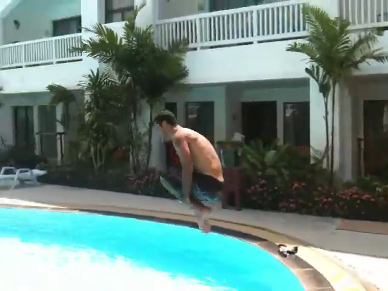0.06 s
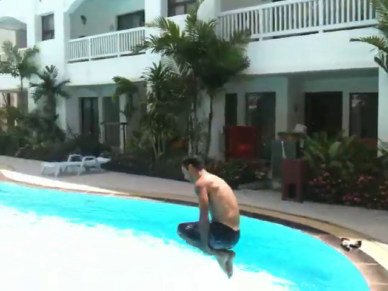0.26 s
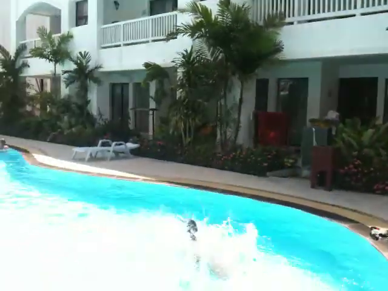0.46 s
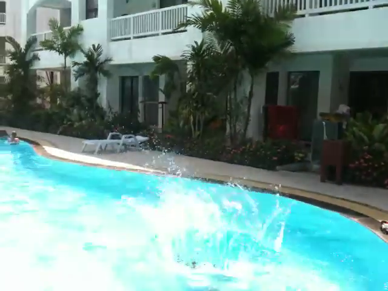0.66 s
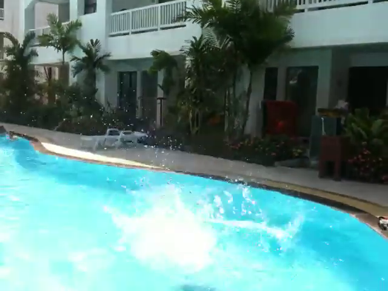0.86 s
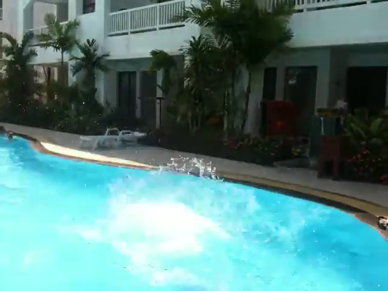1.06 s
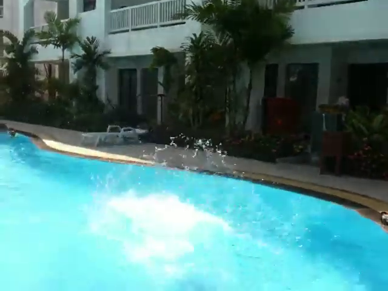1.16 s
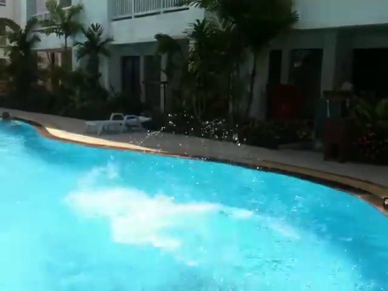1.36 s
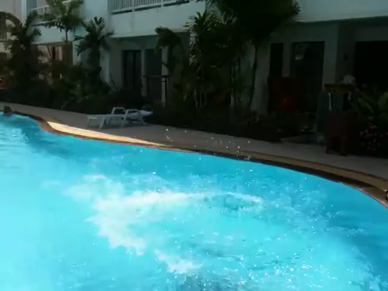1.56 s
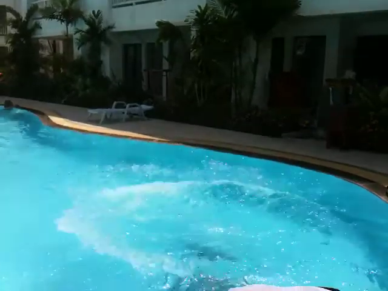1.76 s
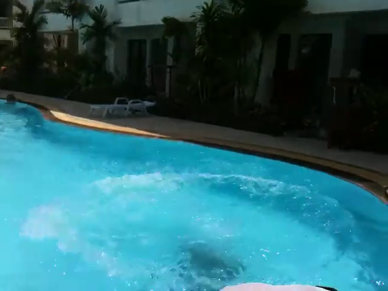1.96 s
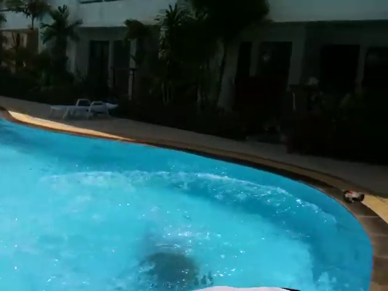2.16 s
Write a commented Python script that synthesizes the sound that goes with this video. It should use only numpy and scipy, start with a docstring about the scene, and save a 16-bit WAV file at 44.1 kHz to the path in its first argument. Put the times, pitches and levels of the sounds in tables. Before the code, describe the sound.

A big splash as a person jumps into an outdoor pool a few metres away, just after wind briefly thumps the microphone. The water gulps and churns, then spray patters down and fizzes away, with a weak courtyard echo.

```python
"""Outdoor swimming pool in a courtyard: a jumper lands tucked, a few metres from the microphone.
Air buffets the microphone during the jump. The body slaps the water and the cavity closes in low
gulps of ringing air pockets. Thrown water rains back as a patter of drops and a froth of small
bubbles that dies away. Ripples trickle at the edge; the house fronts return a weak echo."""
import sys
import numpy as np
from scipy import signal
from scipy.fft import rfft, irfft
from scipy.io import wavfile
from scipy.ndimage import uniform_filter1d

SR = 44100
rng = np.random.default_rng(int(sys.argv[2]) if len(sys.argv) > 2 else 0)


def store_wav(level_fs):
    """Save 16-bit WAV to argv[1]."""
    pcm = np.round(np.clip(np.atleast_2d(level_fs), -1, 1) * 32767)
    wavfile.write(sys.argv[1], SR, pcm.T.astype(np.int16))


N = 97020  # 2.2 s


def undb(db):
    """Decibels to gain."""
    return 10 ** (np.asarray(db) / 20)


def unit(x):
    """Scale to rms 1."""
    return x / np.sqrt(np.mean(x ** 2) + 1e-20)


def envelope(table, column=1):
    """Gain over time from one dB column; silent before the first row."""
    rows = np.array(table)
    return undb(np.interp(np.arange(N) / SR, rows[:, 0], rows[:, column], left=-120))


def colour(x, points):
    """Minimum-phase filter through (f/Hz, level/dB) points; output rms 1."""
    hz, db = np.array(points).T
    bin_hz = np.arange(N // 2 + 1) * SR / N
    log_gain = np.log(undb(np.interp(np.log(bin_hz + 1), np.log(hz), db)))
    cepstrum = irfft(log_gain, N)
    cepstrum[1:N // 2] *= 2
    cepstrum[N // 2 + 1:] = 0
    return unit(irfft(rfft(x) * np.exp(rfft(cepstrum)), N))


def smooth(x, samples):
    """Moving average, applied twice."""
    return uniform_filter1d(uniform_filter1d(x, samples), samples)


def steady(x, samples):
    """Even out the level, keeping the finer grain."""
    return x / np.sqrt(smooth(x ** 2, samples) + 1e-12)


def add(out, start_s, sound):
    """Mix a sound in at start_s."""
    i = min(max(int(start_s * SR), 0), N - 1)
    out[i:i + len(sound)] += sound[:N - i]


def bubble(hz, cycles, glide):
    """Ringing bubble: over `cycles` periods it fades 60 dB and its pitch rises by the fraction `glide`."""
    age = np.arange(int(cycles / hz * SR) + 2) * (hz / SR)  # periods
    phase = 2 * np.pi * age * (1 + glide / cycles / 2 * age)
    flow = np.sin(phase) * np.exp(-np.log(1000) / cycles * age) * (1 - np.exp(-2 * age))
    return np.diff(flow) * (SR / (2 * np.pi * hz))  # pressure follows the change of flow


def bubble_cloud(low_hz, high_hz, cycles, glide, spread_db, count):
    """Bubbles of random size, time and strength; rms 1."""
    out = np.zeros(N)
    when, pitch, strength, ring, sign = rng.random((count, 5)).T
    pitches_hz = low_hz * (high_hz / low_hz) ** pitch
    gains = undb(-spread_db * np.log(np.clip(strength, .02, 1))) * np.sign(sign - .5)
    for at_s, hz, ring_cycles, gain in zip(when * N / SR, pitches_hz, cycles * (.5 + ring), gains):
        add(out, at_s, gain * bubble(hz, ring_cycles, glide))
    return unit(out)


def drops(per_s, spread_db, mist):
    """Dense drop impacts over the hiss of fine mist; `mist` is the rms ratio of hiss to impacts."""
    chance, strength = rng.random((2, N))
    sign, hiss = rng.standard_normal((2, N))
    gains = undb(-spread_db * np.log(np.clip(strength, .005, 1)))
    hits = (chance < per_s / SR) * np.sign(sign) * gains
    return unit(hits) + mist * hiss


# blows of body and splash crown: peak t/s, level/dB, rise/s, fall/s
SLAP_BLOWS = [(0.385, -37.5, 0.0018, 0.035), (0.431, -25.5, 0.015, 0.02), (0.485, -34.5, 0.0054, 0.022),
              (0.545, -47, 0.021, 0.023)]
# slap spectrum: f/Hz, level/dB
SLAP_SPECTRUM = [(50, -25), (150, -25), (320, -5), (520, -17), (800, -15), (1300, -16.5), (2050, -9),
                 (3300, -14), (4200, -23.5), (6000, -10), (7200, -15), (8900, -28.5), (10600, -19),
                 (12300, -24), (14000, -34), (15500, -42)]


def slap(body_hz=900, sink_s=0.028):
    """Feet, seat and back hit the water and tear it into drops; the lows fill in as the jumper sinks."""
    t = np.arange(N) / SR
    power = sum((undb(db) * np.exp(np.minimum((t - peak_s) / rise_s, (peak_s - t) / fall_s))) ** 2
                for peak_s, db, rise_s, fall_s in SLAP_BLOWS)
    tearing = steady(colour(drops(per_s=7400, spread_db=0.0, mist=0.52), SLAP_SPECTRUM), samples=350)
    lows = signal.sosfiltfilt(signal.butter(2, body_hz, fs=SR, output="sos"), tearing)
    immersed = np.clip((t - SLAP_BLOWS[0][0]) / sink_s, 0, 1)
    return (tearing - (1 - immersed) * lows) * np.sqrt(power)


# cavity churn: t/s, level/dB
CHURN_LEVELS = [(0.40, -57), (0.45, -45), (0.53, -41.5), (0.66, -44), (0.75, -47), (0.88, -44), (0.95, -44),
                (1.1, -49), (1.22, -56), (1.37, -48.5), (1.48, -54), (1.76, -57), (1.88, -55), (2.0, -57),
                (2.2, -72)]
# large air pockets pinching off: t/s, f/Hz, level/dB
POCKET_GULPS = [(0.429, 316, -22), (0.492, 211, -30.5), (0.54, 180, -31.5), (0.66, 292, -28.5),
                (0.781, 255, -37.5), (0.825, 246, -28.5), (0.844, 300, -26.5), (0.929, 333, -31.5),
                (0.938, 186, -46), (1.004, 256, -30), (1.101, 246, -38), (1.184, 197, -36),
                (1.301, 281, -36), (1.343, 245, -34.5), (1.508, 324, -39), (1.812, 250, -42),
                (1.866, 295, -39.5), (2.014, 279, -40.5)]


def cavity(start_hz=181, end_hz=314, breakup_s=0.39, spread_oct=0.46, low_cut_hz=104.5):
    """Air dragged under breaks into ever smaller, higher bubbles; large pockets gulp on their own."""
    cloud = np.zeros(N)
    breakup_start_s = CHURN_LEVELS[1][0]
    for when, pitch_a, pitch_b, strength in rng.random((480, 4)):
        at_s = when * N / SR
        centre_hz = end_hz + (start_hz - end_hz) * np.exp(-max(at_s - breakup_start_s, 0) / breakup_s)
        scatter = np.sqrt(6) * (pitch_a + pitch_b - 1)  # triangular, variance 1
        hz = centre_hz * 2 ** (spread_oct * scatter)
        gain = undb(-2.5 * np.log(strength + 0.018))
        add(cloud, at_s, gain * bubble(hz, cycles=9.2, glide=0.071))
    cloud = signal.sosfilt(signal.butter(6, low_cut_hz, "high", fs=SR, output="sos"), cloud)
    out = steady(cloud, samples=1800) * envelope(CHURN_LEVELS)
    for at_s, hz, db in POCKET_GULPS:
        add(out, at_s, undb(db) * bubble(hz, cycles=15.5, glide=0.44))
    return out


# falling water: t/s, froth level/dB, spray level/dB
FALL_LEVELS = [(0.40, -48, -79), (0.45, -37.5, -42), (0.55, -41, -42.5), (0.62, -45, -46.5),
               (0.72, -44.5, -50), (0.80, -43.5, -45.5), (0.90, -44, -43), (0.935, -43, -39),
               (1.1, -47, -38.5), (1.27, -45, -40), (1.38, -39, -40), (1.5, -41.5, -42), (1.62, -46.5, -44),
               (1.78, -47.5, -44), (1.94, -48, -49), (2.08, -49.5, -52), (2.2, -54.5, -53.5)]
# froth spectrum: f/Hz, level/dB
FROTH_SPECTRUM = [(40, -66), (120, -38), (190, -44), (300, 12), (400, -2.5), (520, -9.5), (800, 2.5),
                  (1250, 0), (1650, 6.5), (2400, -2.5), (3600, -1), (6000, -3), (12000, -51)]


def froth():
    """Lumps of water fall back and whip up small ringing bubbles."""
    cloud = bubble_cloud(low_hz=432, high_hz=4830, cycles=13, glide=0.26, spread_db=1.5, count=7000)
    plashes = drops(per_s=2000, spread_db=1.0, mist=0.3)
    foam = colour(cloud + undb(-3) * plashes, FROTH_SPECTRUM)
    return steady(foam, samples=3000) * envelope(FALL_LEVELS)


# spray spectrum: f/Hz, level/dB
SPRAY_SPECTRUM = [(60, -64), (300, -77), (1000, -5.5), (1700, -0.15), (2500, -3.5), (3900, -8),
                  (5000, -3.5), (5900, -0.5), (7000, -5), (8300, -10), (10300, -8.5), (12300, -11.5),
                  (13500, -16.5), (15500, -18.5)]


def spray(flurry_db=0.77):
    """Fine drops patter on the surface in uneven flurries and tiny bubbles fizz."""
    fizz = bubble_cloud(low_hz=1916, high_hz=13040, cycles=25.4, glide=0.34, spread_db=0.5, count=3500)
    patter = drops(per_s=3000, spread_db=0.9, mist=0.62)
    flurry = unit(smooth(rng.standard_normal(N), samples=700))
    shower = steady(colour(patter + undb(-6.5) * fizz, SPRAY_SPECTRUM), samples=3000)
    return shower * envelope(FALL_LEVELS, column=2) * undb(flurry_db * flurry)


# nearby drop impacts: t/s, level/dB, f/Hz, width/oct, fall/s
DROP_TICKS = [(0.031, -52.5, 5130, 2.3, 0.014), (0.0446, -36.5, 1680, 1.8, 0.0017),
              (0.0475, -36, 1900, 2.1, 0.0013), (0.044, -46.5, 7500, 1.2, 0.009),
              (0.222, -50, 8700, 0.43, .002), (0.25, -41.5, 2060, 1.6, 0.002),
              (0.25, -54, 8400, 0.6, 0.0027), (0.321, -48.5, 7800, 0.37, 0.0019),
              (1.088, -42, 6100, 1.0, 0.0036), (1.202, -34, 5500, 1.8, 0.0047),
              (1.687, -39, 5800, 0.83, 0.004), (1.933, -40, 3540, 0.95, 0.0045),
              (1.9953, -31.5, 3460, 1, 0.0021)]
# ringing drips: t/s, f/Hz, level/dB
DRIP_PLINKS = [(0.094, 3600, -41), (0.194, 2250, -41), (0.306, 2100, -43), (0.344, 1450, -44.5),
               (0.482, 2310, -29.5)]


def spatters():
    """Nearby drops land with short wet ticks; others trap a bubble that rings."""
    out, t = np.zeros(N), np.arange(N) / SR
    for at_s, db, hz, width_oct, fall_s in DROP_TICKS:
        edges_hz = np.clip(hz * 2 ** (np.array([-1, 1]) * width_oct / 2), 50, SR / 2 - 100)
        band = signal.butter(2, edges_hz, "band", fs=SR, output="sos")
        tick = signal.sosfilt(band, rng.standard_normal(N))
        add(out, at_s, undb(db) * steady(tick, samples=100) * np.exp(-t / fall_s))
    for at_s, hz, db in DRIP_PLINKS:
        add(out, at_s, undb(db) * bubble(hz, cycles=63, glide=0.12))
    return out


# gust on the microphone: t/s, level/dB
GUST_LEVELS = [(0.06, -64), (0.12, -53.5), (0.16, -45), (0.202, -51), (0.209, -23.5), (0.23, -20),
               (0.257, -26), (0.266, -38), (0.30, -39), (0.37, -60)]
# gust spectrum: f/Hz, level/dB
GUST_SPECTRUM = [(30, -2.5), (70, -17), (120, 0), (160, 0.5), (290, -5.5), (350, -15.5), (450, -16),
                 (650, -35), (1200, -66)]


def gust(eddy_at_s=0.207, eddies_per_s=68.58, eddy_fall_s=0.0057, dull_hz=269, release_s=0.034):
    """Fluttering air thumps the microphone, eddy after eddy; it is duller while it is weak."""
    t = np.arange(N) / SR
    strength = envelope(GUST_LEVELS) * np.exp(-np.maximum(t - GUST_LEVELS[-1][0], 0) / release_s)
    eddy_age_s = (t - eddy_at_s) % (1 / eddies_per_s)
    air = rng.standard_normal(N)
    eddies = colour(air * np.exp(-eddy_age_s / eddy_fall_s), GUST_SPECTRUM)
    lowpass = signal.butter(2, dull_hz, fs=SR, output="sos")
    dull = unit(signal.sosfiltfilt(lowpass, colour(air, GUST_SPECTRUM)))
    eddy_share = strength / strength.max()
    return steady(eddy_share * eddies + (1 - eddy_share) * dull, samples=650) * strength


# ripples and drips: t/s, level/dB
RIPPLE_LEVELS = [(0, -55.5), (0.1, -53.5), (0.22, -55), (0.37, -61.5), (2.2, -77)]
# ripple spectrum: f/Hz, level/dB
RIPPLE_SPECTRUM = [(100, -30), (500, -3), (1500, 1.5), (3500, -1), (6500, -0.5), (10000, -6.5),
                   (13000, -17), (15500, -9)]


def ripples():
    """Small ripples trickle and drip at the pool edge, loudest before the landing."""
    trickle = bubble_cloud(low_hz=1120, high_hz=10100, cycles=35, glide=0.067, spread_db=-1.5, count=1500)
    patter = drops(per_s=1000, spread_db=1.5, mist=0.2)
    lapping = colour(undb(-5) * trickle + patter, RIPPLE_SPECTRUM)
    return steady(lapping, samples=3000) * envelope(RIPPLE_LEVELS)


# open-air spectrum: f/Hz, level/dB
AIR_SPECTRUM = [(25, 18.5), (60, 3), (150, 2.5), (450, 0.5), (1000, 0.5), (2000, -7), (4000, -7.5),
                (7000, -15.5), (10000, -20), (15500, -21)]


def open_air(level_db=-54.5):
    """Faint, steady outdoor noise, strongest in the bass."""
    return undb(level_db) * colour(rng.standard_normal(N), AIR_SPECTRUM)


def courtyard(x, echo_db=-15.5, t60_s=0.65, delay_s=0.02):
    """The house fronts add a weak, dull echo to the direct sound."""
    t = np.arange(N) / SR
    reflections = colour(rng.standard_normal(N), [(200, -12.5), (2500, -11.5), (12000, -20.5)])
    tail = reflections * undb(-60 * t / t60_s) * (t > delay_s)
    return x + undb(echo_db) * signal.fftconvolve(x, tail / np.linalg.norm(tail))[:N]


def scene():
    """The splash in its courtyard, the background and the gust; mono."""
    splash = slap() + cavity() + froth() + spray() + spatters()
    return (courtyard(splash) + ripples() + open_air() + gust())[None]


def record(dry):
    """The recorder thins the deep bass and cuts the top."""
    low_cut_hz, top_hz = 108, 15750
    thin = signal.sosfilt(signal.butter(3, low_cut_hz, "high", fs=SR, output="sos"), dry)
    return signal.sosfilt(signal.ellip(12, .2, 70, top_hz, fs=SR, output="sos"), thin)


dry = scene()
out = record(dry)
store_wav(out)
```